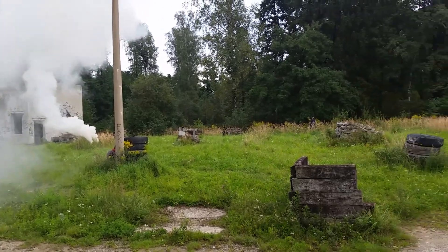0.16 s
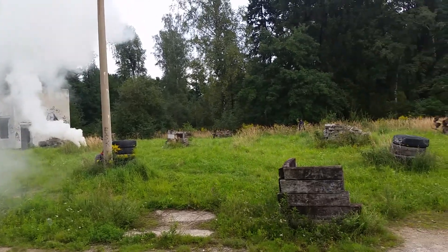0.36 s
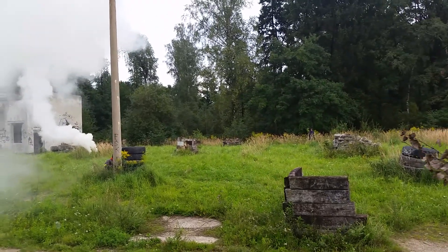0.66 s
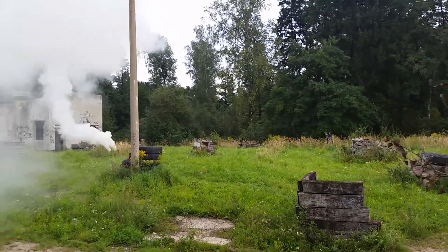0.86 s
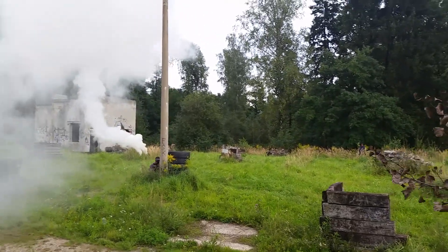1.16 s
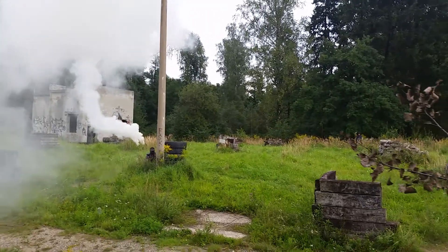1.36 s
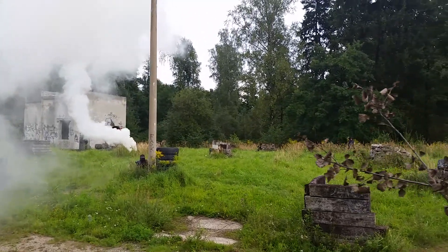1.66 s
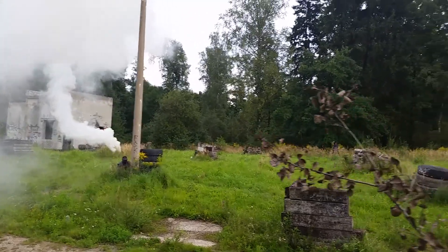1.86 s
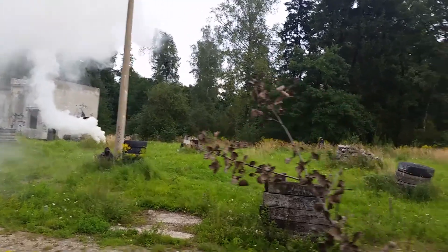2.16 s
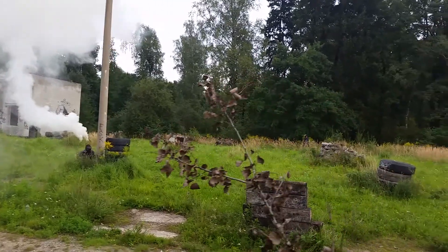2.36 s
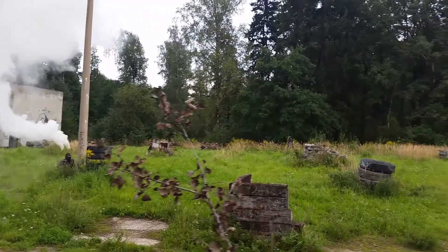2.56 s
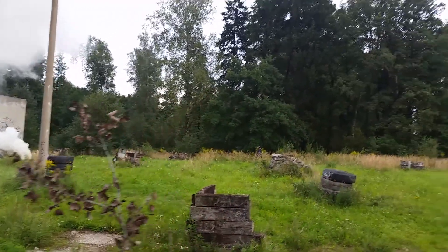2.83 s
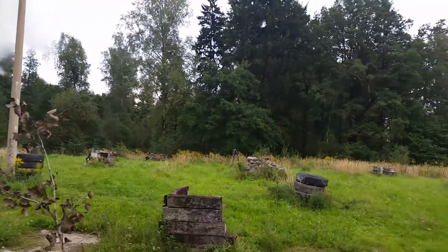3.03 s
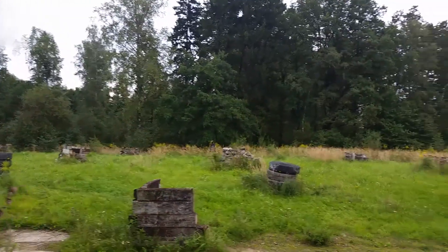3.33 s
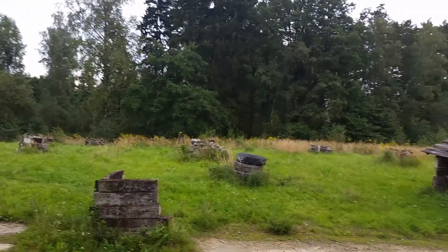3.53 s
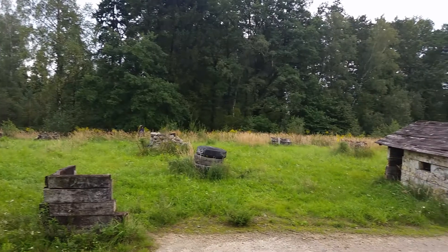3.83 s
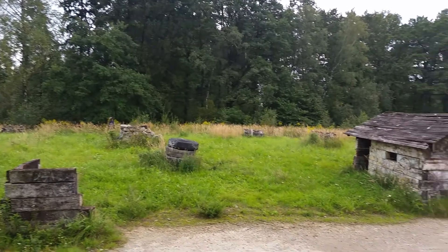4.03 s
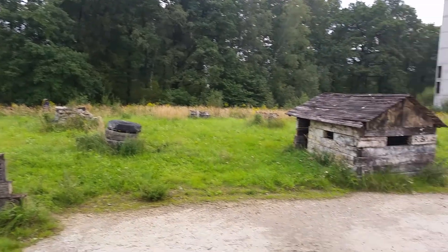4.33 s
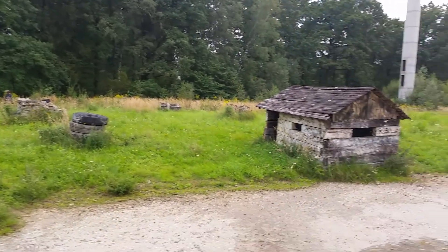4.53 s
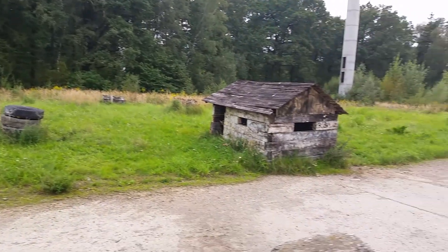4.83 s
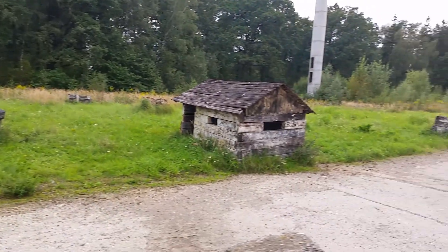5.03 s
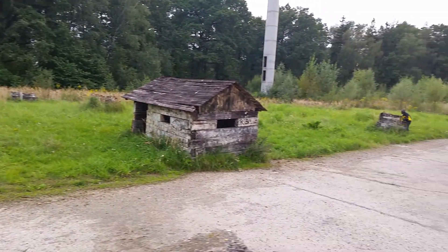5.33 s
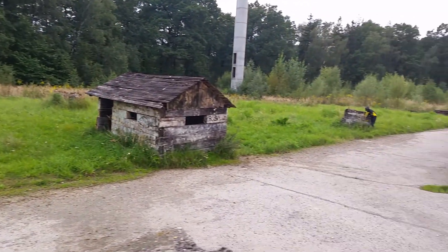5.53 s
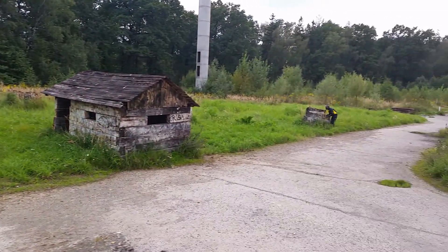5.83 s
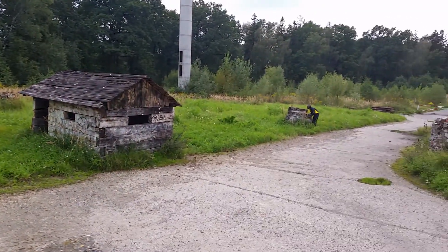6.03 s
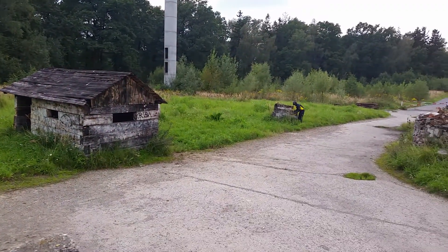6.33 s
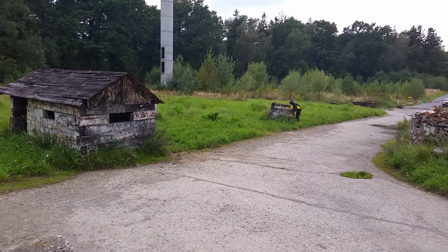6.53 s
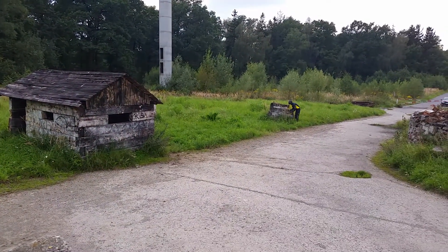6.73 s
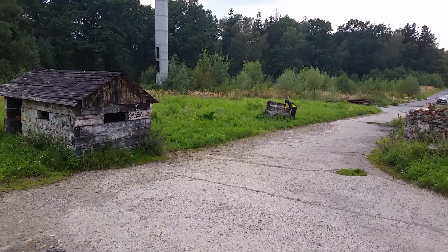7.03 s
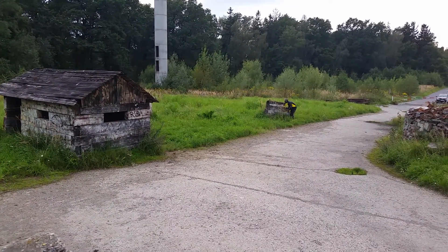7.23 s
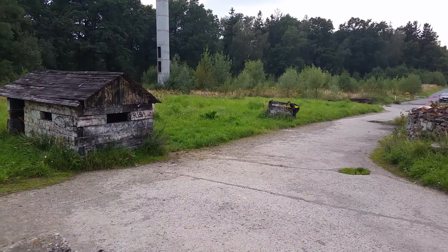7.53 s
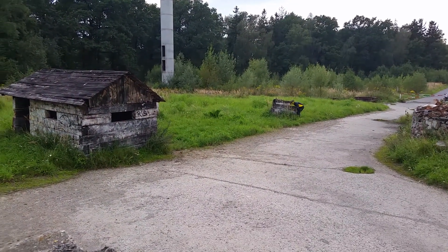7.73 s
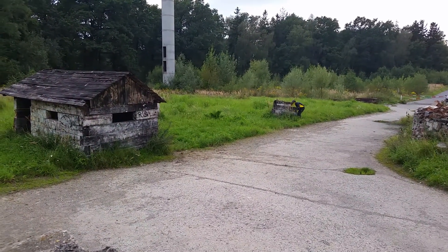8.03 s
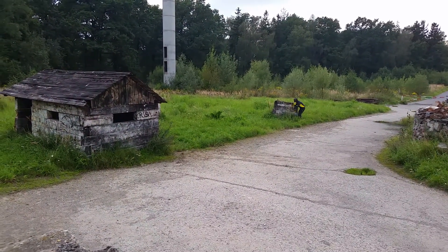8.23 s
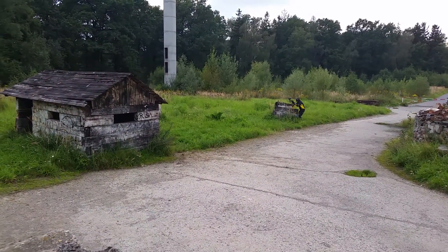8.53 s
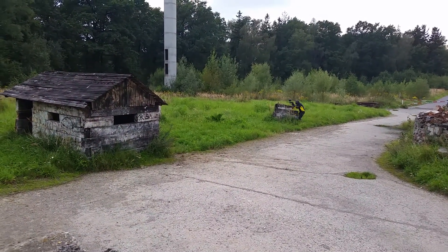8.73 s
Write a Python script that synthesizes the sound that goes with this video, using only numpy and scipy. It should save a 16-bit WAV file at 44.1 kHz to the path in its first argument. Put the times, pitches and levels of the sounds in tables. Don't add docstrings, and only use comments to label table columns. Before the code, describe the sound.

Outdoor paintball field heard from a handheld stereo camera. A smoke canister fizzes while small splats and plastic ticks lead to hollow pops on the right. Balls rattle quickly in a nearby hopper. Louder, brighter pops in the middle overlap the right player, then spread out as faint shots come from the left. Each shot echoes off walls and trees. The hiss sinks nearly to silence, then two duller left pops finish.

```python
import sys
import numpy as np
from scipy import signal
from scipy.fft import rfft, irfft
from scipy.io import wavfile
from scipy.ndimage import uniform_filter1d

SR = 44100
rng = np.random.default_rng(int(sys.argv[2]) if len(sys.argv) > 2 else 0)


def voltage_ratio(decibels):
    exponent = np.asarray(decibels, float) / 20
    return 10 ** exponent


def bounce(signal):
    frames = np.transpose(np.atleast_2d(signal))
    limited = np.clip(frames, -1, 1)
    pcm = np.round(limited * 32767).astype(np.int16)
    wavfile.write(sys.argv[1], SR, pcm)


N = 391608

# (frequency [Hz], level [dB per Hz])
FIELD_TONE = [(18, -29), (30, -3.5), (87, 2), (231, -11.5), (503, -9), (668, -4.5), (801, -8), (1010, -6),
              (1120, -10), (2080, -14), (3150, -25), (5870, -27), (7030, -26), (8000, -29), (14500, -30)]
# (level at gate 0 [dB], slope [dB per dB of gate])
FIELD_LAYERS = [
    (-48.5, 0.5),
    (-54.5, 1.1),
    (-67, 1.5),
    (-58, 0.9),
]
# (time [s], level [dB])
GATE = [(0, 8), (.29, -2.5), (.95, -10), (1.31, -2), (1.5, 4.5), (2.15, 0), (2.77, -1.5), (4.15, 0),
        (4.92, -7.5), (5.45, -9), (6.03, -14), (6.6, -10), (6.85, -5.5), (7.3, -23), (7.91, -30),
        (8.11, -14.5), (8.3, 1), (8.88, -11)]
# (time [s], level [dB])
FACING = [(0, -6), (.5, -2.5), (1.6, 1), (2.4, -1.5), (2.8, -9), (4.1, -12), (6., -21.5), (6.7, -15.5),
          (8.88, -13)]
# (frequency [Hz], likeness [0 to 1])
PORT_LIKENESS = [(25, 0.81), (60, 0.92), (150, 0.73), (380, 0.72), (950, 0.032), (2380, 0.014), (5980, 0),
                 (15000, 0)]
# (frequency [Hz], level [dB])
FIELD_TILT = [(60, -0.5), (180, 2), (550, 0.5), (1650, 3), (4970, -3.5), (15000, 1.5)]
# (frequency [Hz], width [Hz], level [dB])
PORT_RINGS = [(1680, 160, -7), (2160, 300, -4.5), (3800, 260, -1.5), (7006, 600, 4.5), (8620, 300, -2),
              (10400, 1500, -6), (12370, 900, 0)]
# (frequency [Hz], width [Hz], level [dB])
PORT_DIP = (11380, 450, -4)

# (time [s], level [dB], frequency [Hz], left-right [dB])
WIND_BUMPS = [(0.068, -44, 112, 8), (0.347, -38, 53.8, 5), (0.908, -45, 51.5, 12), (4.899, -45, 83, 3),
              (5.174, -33, 71.5, 14), (5.338, -42, 67.3, 17), (5.7, -49, 69.6, 3), (6.338, -41.5, 65, 16),
              (6.389, -42, 54.3, 16), (6.448, -39.5, 70.2, 8), (7.599, -45.5, 62.3, 14)]
# (time [s], level [dB], left-right [dB], bass edge [Hz])
SPLATS = [(0.3222, -51, 0, 2500), (1.042, -51, -2, 2870), (1.212, -54, -6, 1500), (1.3575, -42, -8, 1830),
          (1.6626, -33, -1.5, 4000), (1.6734, -34.5, 6, 4000), (1.6906, -36, -8, 4000),
          (1.82, -34.5, -1, 700), (2.062, -50, -1, 3500), (2.6718, -45.5, -1, 1200),
          (2.874, -31.5, 1, 5000), (2.8976, -30.5, -3, 4970), (3.2, -48.5, 1, 2000),
          (3.235, -51, 1.5, 3000), (4.741, -45.5, 1, 3940), (4.803, -49.5, -3.5, 3000),
          (4.8544, -48.5, -3.5, 4000), (5.242, -54, 4.5, 2500), (5.2505, -50, 4.5, 4000),
          (5.2644, -38, 5, 1500), (5.275, -38.5, 2, 1800), (5.5187, -42.5, 3, 2000),
          (5.2864, -46, 5.5, 4000), (5.6064, -57, 1, 3980), (6.1994, -57, 0.5, 4000),
          (6.7989, -39, -2.4, 3000), (6.8106, -37.5, 4, 2980), (8.0123, -68, 0, 3000),
          (8.565, -56, 0, 1500), (8.3054, -60, -8, 4000)]
# (time [s], level [dB], frequency [Hz], length [ms])
KNOCKS = [(.823, -40.5, 1340, .9), (1.155, -50, 1500, .8), (1.4, -46, 1900, 1.5), (1.415, -46, 1500, 1.5),
          (1.476, -42, 1400, 2.1), (1.486, -43, 850, 2.1), (1.522, -40, 1500, 1.5), (5.2053, -46, 1070, .7),
          (5.518, -31.5, 1490, 1.2), (5.5208, -40, 1450, 1.2), (6.2297, -44.5, 1090, .9),
          (6.3636, -50.5, 1240, 1.4), (6.7965, -27.5, 1420, 1.4), (6.8016, -35, 2010, .7),
          (7.254, -40, 2300, .9), (7.7309, -66, 1330, .8), (7.8229, -73.5, 1360, .7),
          (8.0121, -42.5, 1370, 0.99), (8.565, -39, 1290, 2.7), (8.5695, -50.5, 1150, 2.1)]
# (time [s], level [dB], frequency [Hz], length [ms])
SNAPS = [
    (1.2118, -40, 6000, .12),
    (1.3573, -28, 7600, .15),
]
# (time [s], level [dB], frequency [Hz],
# length [ms])
RATTLE = [(2.8713, -26.5, 1480, 1.9), (2.8745, -24, 1050, 0.93), (2.8815, -30, 830, 1.5),
          (2.8851, -29, 1750, 0.9), (2.8876, -21, 1540, 0.67), (2.8907, -25, 1730, 0.7),
          (2.8936, -33, 1600, 0.5), (2.8972, -29, 2000, 0.8), (2.9, -23.5, 1090, 0.86),
          (2.9026, -23.5, 1400, 0.73), (2.907, -31, 1440, 0.6), (2.9323, -28, 1520, 0.9),
          (2.9355, -25, 1870, 0.8), (2.9375, -40.0, 1430, 0.9), (2.9406, -37.0, 1230, 0.7),
          (2.952, -29.5, 1460, 0.52), (2.9552, -32, 1130, 0.6), (2.959, -20.5, 1290, 0.71),
          (2.9663, -40, 1100, 0.8), (2.9686, -38.0, 1330, 0.5), (2.971, -23.5, 1270, 1.3),
          (2.9732, -27.5, 1230, 0.52), (2.9764, -35.5, 1270, 1.0), (2.9803, -19.5, 1240, 1.3),
          (2.9844, -33.5, 1360, 0.44), (2.9884, -31.0, 1230, 0.7), (2.9925, -27.0, 1400, 1.7),
          (2.9971, -32.5, 1420, 0.7), (2.9999, -35.5, 1170, 0.7), (3.0063, -42, 1170, 1.1),
          (3.0114, -40, 1420, 0.5), (3.0237, -44, 1670, 0.6), (3.0308, -34, 950, 1.4),
          (3.045, -41.5, 1060, 0.9), (3.0616, -37.0, 1220, 0.8), (3.0724, -36, 1680, 0.9),
          (3.833, -42, 1140, 1.0), (3.8398, -42, 1880, 0.6), (3.843, -44.0, 1860, 0.6),
           (3.8488, -38, 1780, 0.6), (3.8542, -44.0, 1050, 1.4), (3.8623, -48.0, 1280, 0.6),
           (3.872, -47, 960, 1.8), (3.8756, -46.5, 1100, 0.6), (3.8944, -46.0, 1100, 0.7),
           (3.8978, -39, 950, 2.1), (3.901, -42, 1440, 0.6), (3.9034, -33, 1610, 0.6),
           (3.9066, -39, 1250, 1.3), (3.9116, -42.5, 970, 1.3), (3.9186, -39, 1090, 0.8),
           (3.9376, -48.0, 1210, 0.6), (3.9445, -39, 970, 1.0), (3.951, -34, 1400, 1.4),
           (3.9565, -40.0, 1530, 1.8), (3.9602, -43, 870, 2.0), (3.9689, -39.5, 1310, 1.8),
           (3.9743, -47, 1340, 1.0), (3.9788, -32, 1390, 1.3), (3.9873, -43.5, 1330, 1.1),
           (4.0165, -43, 1380, 1.7), (4.0258, -24.5, 1450, 1.4), (4.0318, -32, 1240, 2.4),
           (4.0395, -33, 1350, 1.7), (4.0431, -35, 1480, 1.4), (4.0718, -48.5, 1600, 0.7),
           (4.09, -34.0, 1440, 1.2), (4.0928, -42.5, 1480, 0.8), (4.1168, -36, 1530, 0.7),
           (4.119, -39, 1510, 0.5), (4.1218, -45.5, 1480, 0.8), (4.1272, -47.5, 1540, 0.6)]

# (time [s], barrel [dB], gas over barrel [dB], push over barrel [dB], echo over barrel [dB])
RIGHT_SHOTS = [(1.545, -13, -6.5, -10, -6.5), (2.194, -13.5, -8.5, -11.5, -7),
               (2.771, -14.5, -8.5, -9.5, -4.5), (3.367, -13, -9.5, -13, -6.5),
               (4.218, -14.5, -2.5, -13.5, -8)]
MIDDLE_SHOTS = [(4.157, -7, -13, -19.5, -5), (4.56, -6.5, -10.5, -21, -5.5), (4.983, -9.5, -13, -24, -6.5),
                (5.418, -10, -12.5, -22, -8.5)]
AWAY_SHOTS = [(6.006, -13, -16.5, -15.5, -4.5), (6.558, -13.5, -14, -17.5, -6.5),
              (7.022, -13.5, -11.5, -11.5, -4.5)]
LEFT_SHOTS = [(4.424, -30, 6, -2.5, -13.5), (5.684, -40, -2, -37, -16), (6.761, -22, -10, -11, -7.5),
              (7.205, -24, -9, -12.5, -15.5), (8.128, -28, -12, -3, -2.5), (8.61, -17.5, -13, -9, -6)]
# (frequency [Hz], level [dB], t60 [s])
RIGHT_BARREL = [(370, -4.5, .02), (820, 1.5, 0.026), (993, 7.5, 0.066), (1320, -6.5, 0.014),
                (2280, -1.5, 0.027), (3530, -7.5, 0.022)]
MIDDLE_BARREL = [(568, 1.5, 0.028), (920, -0.5, 0.02), (1330, -2.5, 0.013), (1640, -1.5, .05),
                 (1970, -7, .03), (2200, -6.5, 0.043), (3640, -8.5, 0.023), (5040, -13.5, .015)]
AWAY_BARREL = [(310, -1, .03), (533, 6.5, 0.014), (875, -2, 0.02), (1270, -2.5, 0.033), (1600, -25, 0.019),
               (2080, -8, 0.017)]
LEFT_BARREL = [(287, 7, 0.026), (1200, -1, .02), (1776, 3, 0.018), (2220, -0.5, 0.027),
               (2700, -10.5, 0.012)]
# (push [Hz], rebound [s], ground bounce [s],
#                        wall echo [s], wall spread [s], wall level [dB], wall treble edge [Hz])
RIGHT_SPOT = (110, 0.0069, 0.00235, 0.0023, 0.018, 1.8, 8500)
MIDDLE_SPOT = (150, .0075, 0.001458, .027, .011, 4, 2300)
AWAY_SPOT = (136, 0.0065, .0014, 0.022, 0.014, 5.3, 600)
LEFT_SPOT = (108, 0.0077, 0.0039, 0.015, 0.00072, 0.89, 560)
# (time [s], delay [ms])
RIGHT_LAG = [(3., .45), (4.2, .39)]
MIDDLE_LAG = [(4.16, .2), (4.56, .09), (5., 0), (6., -.18), (7., -.2)]
LEFT_LAG = [(4.4, -.39), (5.2, -.48), (8.6, -.5)]
# (frequency [Hz], level [dB])
GAS = [(880, -12.5), (1500, -4), (2040, -7), (3020, -10.5), (6440, -10), (8310, -9), (10300, -17.5),
       (11800, -15), (14300, -20), (15000, -29.5), (15800, -46.5)]
# (frequency [Hz], t60 [s])
TREES_DECAY = [(100, 0.27), (400, 0.32), (1500, 0.34), (4000, 0.42), (7000, .35), (10000, 0.34),
               (14000, 0.25)]
# (frequency [Hz], level [dB])
TREES_TONE = [(50, -24.5), (110, -8), (300, 7), (600, -10), (1500, -4), (4000, 0.5), (8000, -0.5),
              (13000, 5.5)]
# (arrival [s], hold [s], level under the echo [dB], fall [dB per s])
RIGHT_LATE = [
    (0.015, 0.046, -20.5, 41.5),
    (0.21, 0.026, -24.5, 56),
    (0.092, 0.18, -30, 77),
    (0.12, 0.098, -28, 91),
]
MIDDLE_LATE = [
    (.03, .02, -29.5, 80),
    (0.028, 0.031, -34.5, 47),
    (0.18, 0.085, -40.5, 89),
    (0.091, 0.088, -39, 87),
]
AWAY_LATE = [
    (0.038, .02, -25, 56),
    (0.21, 0.017, -36, 83),
    (0.15, .03, -54, 174),
    (0.18, .04, -29.5, 170),
]
LEFT_LATE = [
    (0.085, 0.034, -20, 85),
    (.17, .03, -28, 77),
    (0.11, .04, -34, 73),
    (0.085, 0.027, -26, 49),
]

# (frequency [Hz], width [Hz], peak [s], t60 [s], level under the echo [dB])
HUT = (190, 131, 0.06, 0.59, -21.5)
# (time [s], frequency [Hz], width [Hz], level [dB])
DRONE = (8.5, 97, 31, -50)
# (frequency [Hz], level [dB])
DROPOUT = [(8000, -39), (10600, -35), (11350, -30), (12200, -35), (12900, -29), (14600, -28)]
# (extra [dB], hold [s], loudness that counts as a shot [dB])
DROPOUT_AFTER_SHOT = (8, .3, -60)

SPLIT = np.array([[0.5], [-0.5]])
NEAR_BOLT_DB, FAR_BOLT_DB = -27, -36
MUZZLE_S = 0.0257


def evened(x):
    return x / np.sqrt(np.mean(x ** 2) + 1e-20)


def read(points, hz):
    f, value = np.transpose(points)
    return np.interp(np.log(hz + 1), np.log(f + 1), value)


def add(mix, s, sound):
    part = mix[:, round(s * SR):][:, :sound.shape[1]]
    part += sound[:, :part.shape[1]]


def tinted(x, db_of):
    hz = np.fft.rfftfreq(x.shape[-1], 1 / SR)
    return irfft(rfft(x) * voltage_ratio(db_of(hz)), x.shape[-1])


def band(centre_hz, width, count):
    noise = rng.standard_normal(count)
    return evened(tinted(noise, lambda hz: -20 * np.log10(1 + (2 * (hz - centre_hz) / width) ** 2)))


def port_db(hz):
    rings = sum(voltage_ratio(db) / (1 + (2 * (hz - f) / width) ** 2) for f, width, db in PORT_RINGS)
    dip_hz, width, dip_db = PORT_DIP
    dip = dip_db / (1 + (2 * (hz - dip_hz) / width) ** 2)
    return 20 * np.log10(1 + rings) + dip - 60 * (hz > 14700)


def ports(x, lag_ms, shade_db=16.0, bass_db=2.5):
    hz = np.fft.rfftfreq(x.shape[-1], 1 / SR)
    pan_db = bass_db / (1 + (hz / 2500) ** 2) - shade_db * lag_ms / (1 + (4000 / (hz + 1)) ** 2)
    late = np.exp(-2j * np.pi * hz * lag_ms * SPLIT / 1000)
    return irfft(rfft(x) * voltage_ratio(pan_db * SPLIT) * late, x.shape[-1])


def layer_gains(t):
    db, slope = np.transpose(FIELD_LAYERS)[:, :, None]
    power = voltage_ratio(db + slope * np.interp(t, *np.transpose(GATE))) ** 2
    for shots, late in ((RIGHT_SHOTS, RIGHT_LATE), (MIDDLE_SHOTS, MIDDLE_LATE),
                        (AWAY_SHOTS, AWAY_LATE), (LEFT_SHOTS, LEFT_LATE)):
        arrive_s, hold_s, under_db, fall = np.transpose(late)[:, :, None]
        for s, barrel_db, *_, echo_db in shots:
            early = np.maximum(s + arrive_s - t, 0)
            gone = np.maximum(t - s - arrive_s - hold_s, 0)
            late_db = barrel_db + echo_db + under_db - 145 * early - fall * gone
            power += (t > s) * voltage_ratio(late_db) ** 2
    power[-1] *= voltage_ratio(np.interp(t, *np.transpose(FACING))) ** 2
    return np.sqrt(power)


def field():
    frames, hz = N // 256 + 5, np.fft.rfftfreq(1024, 1 / SR)
    a, b, c, d, patches = rng.standard_normal((frames, 513, 5)).T
    patches = uniform_filter1d(patches, size=12, axis=0)
    patches = evened(uniform_filter1d(patches, size=8, axis=1))
    flicker = evened(uniform_filter1d(rng.standard_normal(frames), size=2))
    gains = layer_gains(np.arange(frames) * 256 / SR)
    tone = voltage_ratio(read(FIELD_TONE, hz) + port_db(hz))
    edges = [1 / (1 + (edge_hz / (hz + 1)) ** 6) for edge_hz in (300, 2600, 6000)]
    shares = -np.diff([hz * 0 + 1, *edges, hz * 0], axis=0)
    size = np.zeros((len(hz), frames))
    for share, gain in zip(shares, gains):
        layer = tone * np.sqrt(share)
        size += np.outer(layer / np.linalg.norm(layer), gain)
    same = np.clip(read(PORT_LIKENESS, hz), -1, 1)[:, None]
    left = a + 1j * b
    right = same * left + np.sqrt(1 - same ** 2) * (c + 1j * d)
    tilt_db = SPLIT[:, :, None] * read(FIELD_TILT, hz)[:, None]
    z = np.array([left, right]) * size * voltage_ratio(2.21 * patches + 1.5 * flicker + tilt_db)
    return 0.84 * signal.istft(z, nperseg=1024, noverlap=768)[1][:, :N]


def wind_bumps():
    out, t = np.zeros((2, N)), np.arange(4096) / SR
    for s, db, hz, pan_db in WIND_BUMPS:
        swing = np.sin(2 * np.pi * hz * t) * voltage_ratio(-60 * t / 0.049)
        swing *= np.clip(t / 0.0035, 0, 1)
        add(out, s, 2.5 * voltage_ratio(db) * swing * voltage_ratio(SPLIT * pan_db))
    return out


def splats():
    out, t = np.zeros((2, N)), np.arange(4096) / SR
    shape = (1 - np.exp(-(t / 0.0003) ** 2)) * voltage_ratio(-60 * t / 0.02)
    for s, db, pan_db, edge_hz in SPLATS:
        noise = rng.standard_normal((2, len(t)))
        hiss = tinted(noise, lambda hz: read(GAS, hz) + port_db(hz)
                      - 20 * np.log10(1 + (edge_hz / (hz + 1)) ** 3))
        add(out, s, voltage_ratio(db) * evened(hiss) * shape * voltage_ratio(SPLIT * pan_db))
    return out


def knock(db, hz, length_ms, lag_ms):
    t = np.arange(1024) / SR - 0.005
    u = t / (np.hypot(length_ms, 0.4 / hz * 1000) / 1000)
    ring_out = voltage_ratio(-8 - 60 * abs(t) * hz / 17)
    shape = np.where(t < 0, np.exp(-3.2 * u ** 2), np.maximum(np.exp(-2.4 * u ** 2), ring_out))
    tone = np.cos(2 * np.pi * hz * t) + 0.15 * np.cos(2 * np.pi * 1.59 * hz * t)
    noise = rng.standard_normal(len(t))
    scrape = evened(tinted(noise, lambda f: -20 * np.log10(1 + ((f - hz) / (0.45 * hz)) ** 2)))
    scrape = voltage_ratio(-14) * scrape * np.exp(-((t * hz - 2.5) / 3.5) ** 2)
    return voltage_ratio(db) * ports(scrape - shape * tone, lag_ms)


def balls_and_shells():
    out = np.zeros((2, N))
    for rows, lag_ms in ((RATTLE + KNOCKS, 0.046), (SNAPS, 0.4)):
        for s, *ball in rows:
            add(out, s - 0.005, knock(*ball, lag_ms))
    return out


def blast(t, hz, t60, rise_s):
    build = np.exp(np.minimum(t, 0) / rise_s)
    swing = np.cos(2 * np.pi * hz * t) * voltage_ratio(-60 * abs(t) / t60)
    return np.where(t < 0, build, swing)


def barrel_rings(t, barrel, bounce_s):
    detune = 1 + 0.012 * rng.standard_normal(len(barrel))
    rings = np.zeros(len(t))
    for (hz, db, t60), d in zip(barrel, detune):
        direct = blast(t - 0.0003, hz * d, t60, 0.00017)
        bounced = blast(t - 0.0003 - bounce_s, hz * d, t60, 0.00033)
        rings += voltage_ratio(db) * (direct + 0.46 * bounced)
    rings *= np.clip((0.0065 - t) / 0.003, 0.35, 1) * np.clip(0.4 + t / 0.0012, 0.25, 1)
    return 1.427 * rings / abs(rings).max()


def gas_hiss(t, bolt_db):
    closing = np.maximum(np.clip((0.0052 - t) / 0.0032, 0, 1), 0.65 * np.exp(-t / 0.0057))
    valve = np.clip(t / 0.0015, 0, 1) * closing
    bolt = np.clip((t + 0.0215) / 0.00075, 0, 1) * np.clip((-0.0145 - t) / 0.0038, 0, 1)
    middle, side = evened(tinted(rng.standard_normal((2, len(t))), lambda hz: read(GAS, hz)))
    return (middle + side * SPLIT) * (valve + voltage_ratio(bolt_db) * bolt)


def gas_push(t, push_hz, rebound_s):
    after = t - rebound_s
    swell = np.exp(-(after / np.where(after < 0, 0.004, 0.0045)) ** 2) * np.clip(t / 0.0018, 0, 1)
    return 1.57 * swell * np.cos(2 * np.pi * push_hz * after)


def echoes(x, wall_s, spread_s, wall_db, wall_hz):
    count = 16000
    a, b = rng.standard_normal((2, count))
    hz, t, za = signal.stft(a, SR, nperseg=128)
    hz, zb = hz[:, None], signal.stft(b, SR, nperseg=128)[2]
    wall = voltage_ratio(wall_db) * np.exp(-((t - wall_s) / spread_s) ** 2) / (1 + (hz / wall_hz) ** 2)
    trees = np.clip((t - 0.005) / 0.015, 0, 1) * voltage_ratio(-60 * t / read(TREES_DECAY, hz))
    same = 1 / (1 + (hz / 1300) ** 3)
    z = np.array([za, same * za + np.sqrt(1 - same ** 2) * zb])
    z = z * (wall + trees) * voltage_ratio(read(TREES_TONE, hz))
    tail = signal.istft(z, SR, nperseg=128)[1][:, :count]
    power = abs(rfft(x, count)) ** 2
    treble = np.arange(len(power)) > 900
    colour = np.where(treble, uniform_filter1d(power, size=700), uniform_filter1d(power, size=60))
    colour = uniform_filter1d(np.sqrt(colour), size=24)
    log_colour = np.log(np.r_[colour, colour[-2:0:-1]] + 1e-6)
    phase = -signal.hilbert(log_colour).imag[:len(power)]
    heard = colour * np.exp(1j * phase) * voltage_ratio(port_db(np.fft.rfftfreq(count, 1 / SR)))
    return irfft(rfft(tail / np.linalg.norm(tail[0])) * heard)


def shot(row, barrel, place, lag, bolt_db):
    s, barrel_db, gas_db, push_db, echo_db = row
    push_hz, rebound_s, bounce_s, *wall = place
    t = np.arange(4096) / SR - MUZZLE_S
    direct = barrel_rings(t, barrel, bounce_s) + voltage_ratio(gas_db) * gas_hiss(t, bolt_db)
    direct = direct + voltage_ratio(push_db) * gas_push(t, push_hz, rebound_s)
    direct = signal.lfilter(*signal.butter(2, 70, "high", fs=SR), direct)
    heard = voltage_ratio(echo_db) * echoes(direct[0], *wall)
    heard = np.pad(heard, ((0, 0), (round(MUZZLE_S * SR), 0)))
    heard[:, :len(t)] += ports(direct, np.interp(s, *np.transpose(lag)))
    return s - 0.025, voltage_ratio(barrel_db) * heard


def markers():
    out = np.zeros((2, N))
    for shots, *marker in ((RIGHT_SHOTS, RIGHT_BARREL, RIGHT_SPOT, RIGHT_LAG, NEAR_BOLT_DB),
                           (MIDDLE_SHOTS, MIDDLE_BARREL, MIDDLE_SPOT, MIDDLE_LAG, FAR_BOLT_DB),
                           (AWAY_SHOTS, AWAY_BARREL, AWAY_SPOT, MIDDLE_LAG, FAR_BOLT_DB),
                           (LEFT_SHOTS, LEFT_BARREL, LEFT_SPOT, LEFT_LAG, FAR_BOLT_DB)):
        for row in shots:
            add(out, *shot(row, *marker))
    return out


def hut():
    centre_hz, width, peak_s, t60, under_db = HUT
    out, t = np.zeros((2, N)), np.arange(16384) / SR
    shape = np.clip(t / peak_s, 0, 1) * voltage_ratio(-60 * np.maximum(t - peak_s, 0) / t60)
    for shots, aim_db in ((MIDDLE_SHOTS, -4.5), (AWAY_SHOTS, 0)):
        for s, barrel_db, *_, echo_db in shots:
            level_db = barrel_db + echo_db + under_db + aim_db + 1.6 * SPLIT
            add(out, s, voltage_ratio(level_db) * band(centre_hz, width, len(t)) * shape)
    return out


def drone():
    s, hz, width, db = DRONE
    fade = np.clip((np.arange(N) / SR - s) / 0.05, 0, 1)
    return voltage_ratio(db) * band(hz, width, N) * fade


def treble_dropout(x):
    hz, t, z = signal.stft(x, SR, "cosine", nperseg=2048, noverlap=1024)
    power = (abs(z) ** 2).mean(0) + 1e-20
    hz = hz[4:1024:8, None]
    middle_db = 10 * np.log10(power[20:280].mean(0))
    bands_db = 10 * np.log10(power[:1024].reshape(128, 8, -1).mean(1))
    extra_db, hold_s, loud_db = DROPOUT_AFTER_SHOT
    since = t - np.maximum.accumulate(np.where(middle_db > loud_db, t, -9))
    limit_db = middle_db + extra_db * (since < hold_s) + read(DROPOUT, hz)
    luck = rng.standard_normal(bands_db.shape[::-1]).T
    limit_db += 3 * evened(uniform_filter1d(luck, size=3))
    drop = (bands_db < limit_db) & (since > 0.03) & (hz > 8000) & (hz < 15000)
    keep = np.r_[np.repeat(~drop, repeats=8, axis=0), np.ones((1, len(t)))]
    return signal.istft(z * keep, SR, "cosine", nperseg=2048, noverlap=1024)[1][:, :N]


def scene():
    sound = field() + wind_bumps() + splats() + balls_and_shells() + markers() + hut() + drone()
    return sound + voltage_ratio(-95) * tinted(rng.standard_normal((2, N)), port_db)


def top_cut(x):
    return signal.sosfilt(signal.butter(12, 15910, fs=SR, output="sos"), x)


def record(dry):
    mix = signal.lfilter(*signal.butter(2, 48, "high", fs=SR), dry)
    mix = treble_dropout(mix)
    return top_cut(mix)


dry = scene()
out = record(dry)
bounce(out)
```